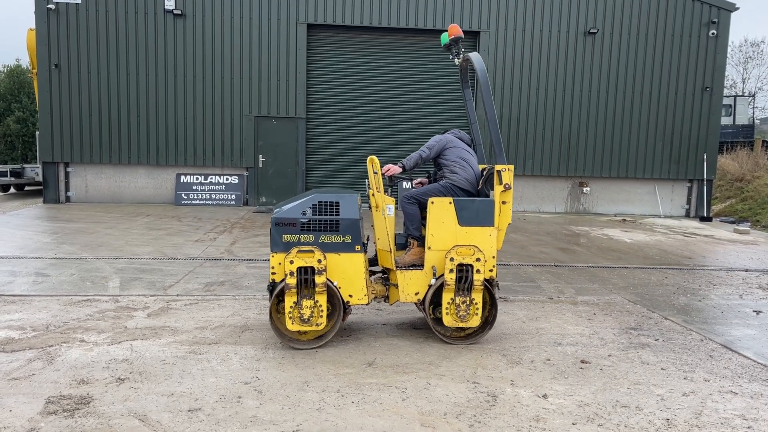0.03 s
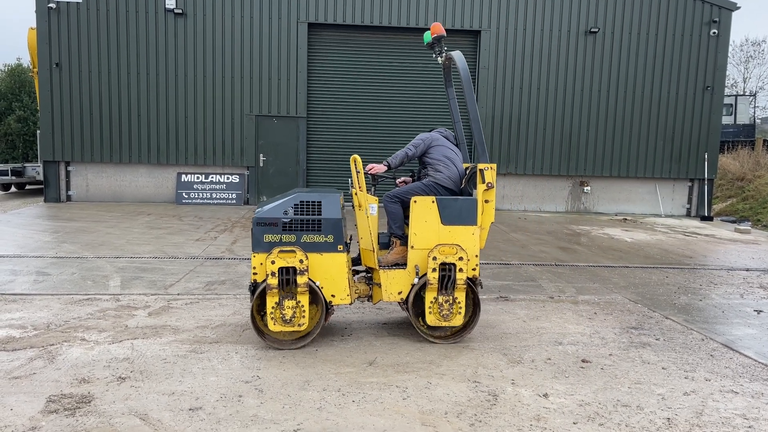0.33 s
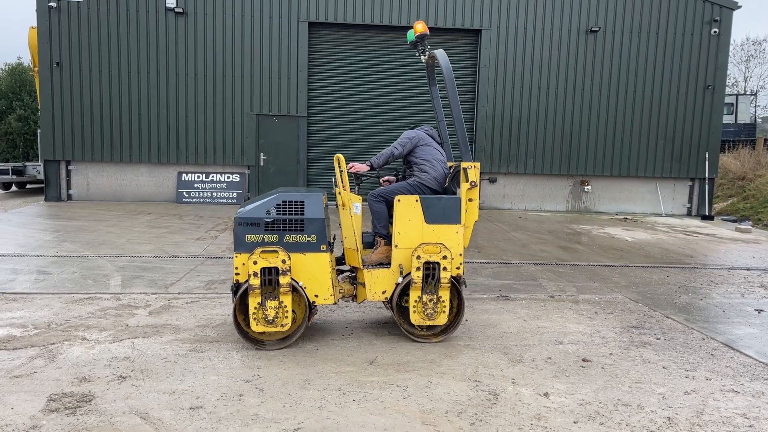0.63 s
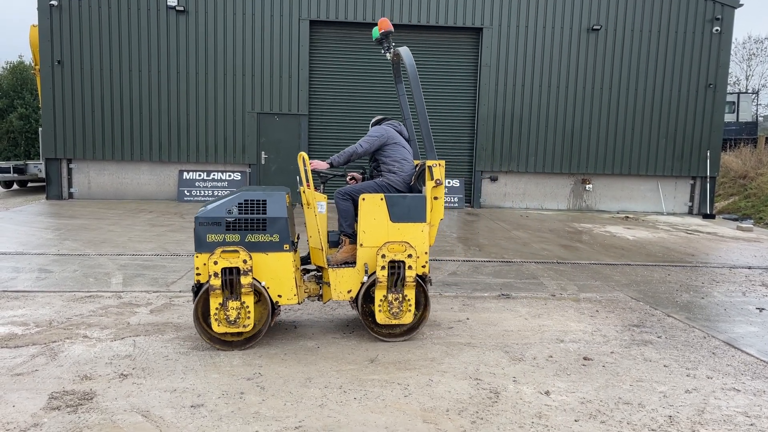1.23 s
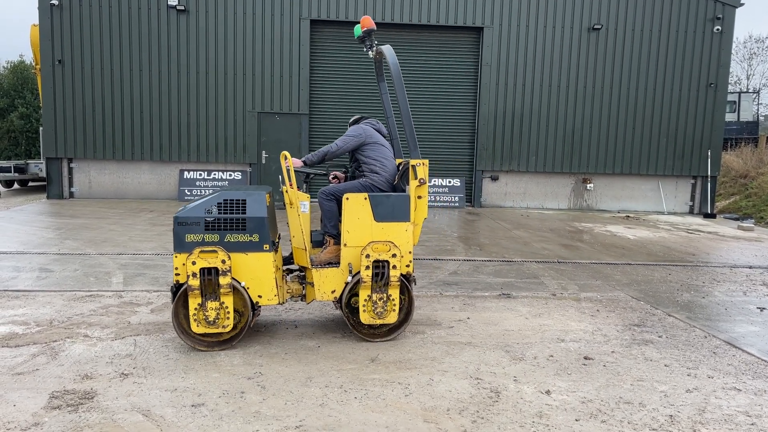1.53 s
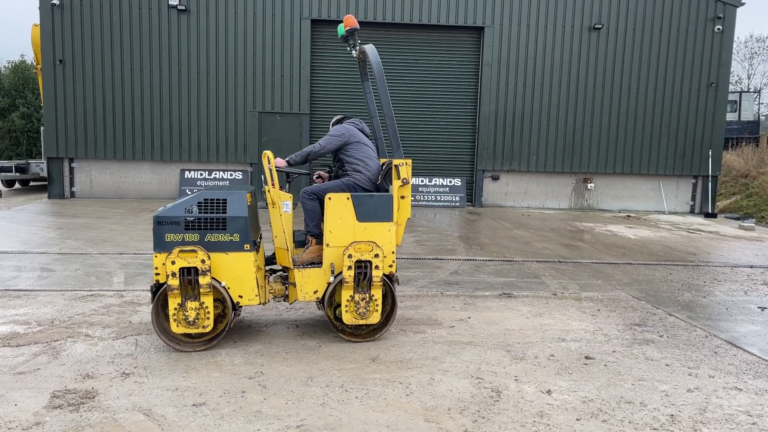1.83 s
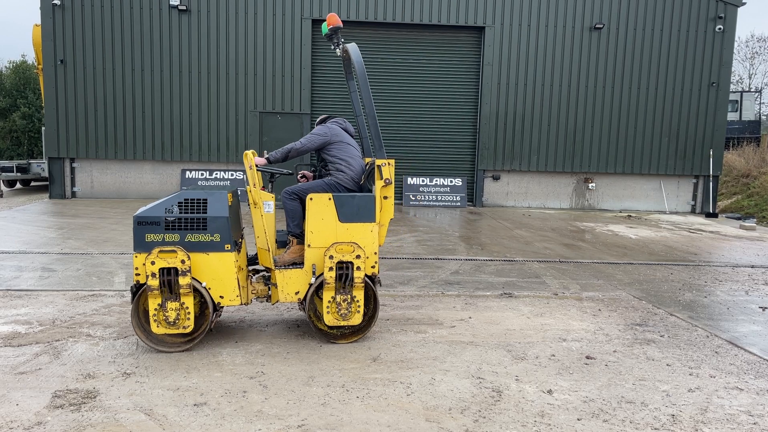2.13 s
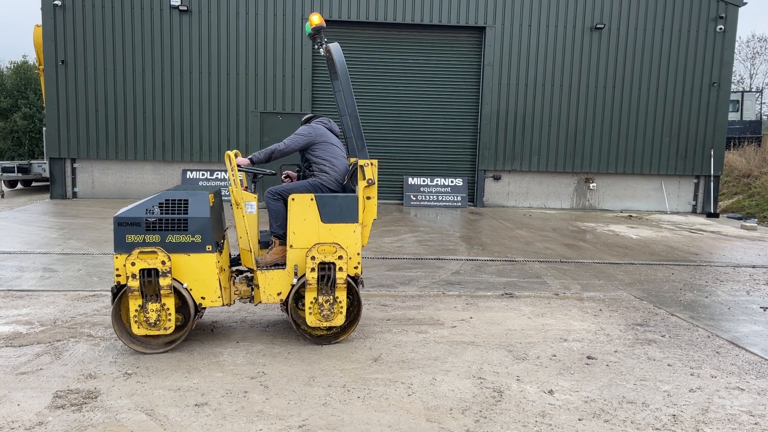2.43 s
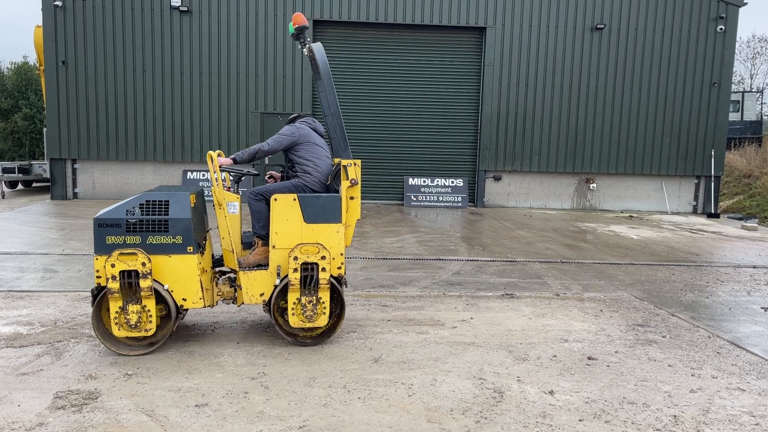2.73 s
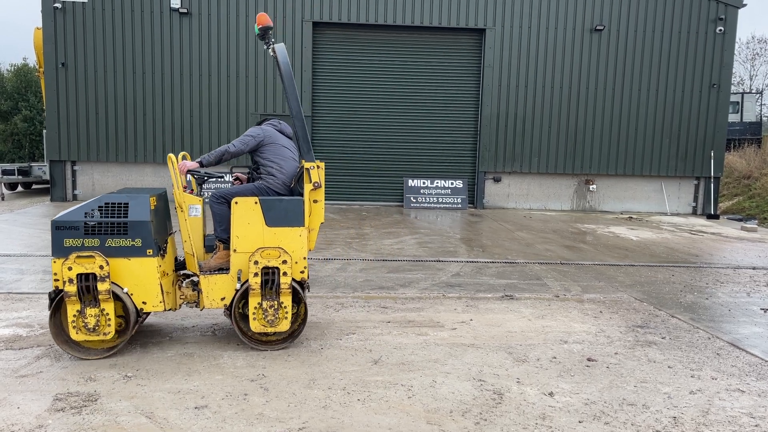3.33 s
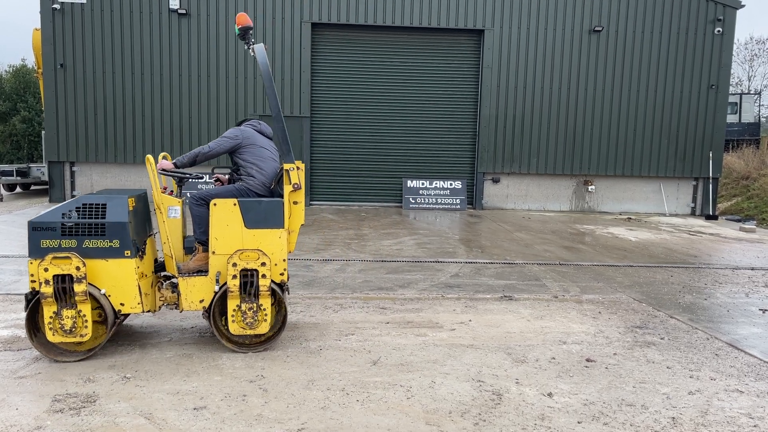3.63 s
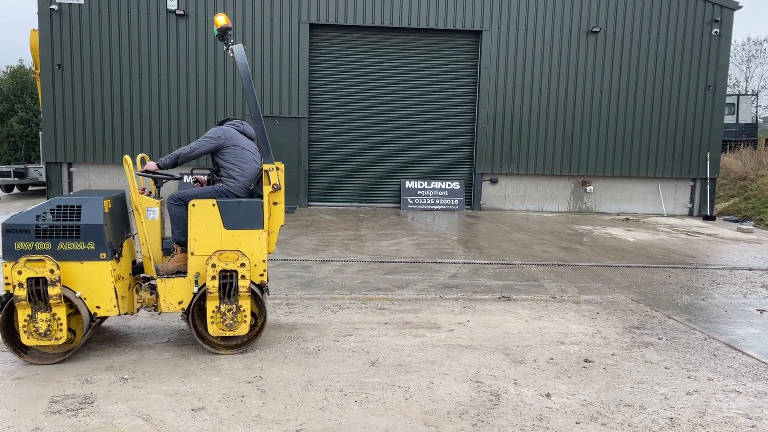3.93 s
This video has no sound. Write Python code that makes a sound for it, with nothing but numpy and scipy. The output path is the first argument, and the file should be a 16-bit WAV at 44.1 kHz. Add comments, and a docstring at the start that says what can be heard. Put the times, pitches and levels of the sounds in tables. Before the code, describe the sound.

Heard from a few metres away outdoors, a small road roller's diesel engine runs at a nearly constant speed over a low, wavering drum hum. Faint metal rattles and ticks of crushed stones continue, growing busier in the second half.

```python
"""A small diesel road roller creeps across a concrete yard, a few metres from a phone.
Its engine drones and clatters at a nearly steady speed. The drum shaker slows at the start,
then forces the steel drums to boom at its harmonics, which beat against the engine's.
Grit crackles under the drums, stones are crushed, one squeaks, and loose panels rattle.
A shed wall reflects all but the drone, boom and rumble."""
import sys
import numpy as np
from scipy import signal
from scipy.fft import rfft, irfft
from scipy.io import wavfile
from scipy.ndimage import uniform_filter1d

SR = 44100
rng = np.random.default_rng(int(sys.argv[2]) if len(sys.argv) > 2 else 0)


def inscribe(sig):
    """Save sig as 16-bit PCM at rate SR to the path in sys.argv[1].

    A 1-D sig is mono; a 2-D sig holds one channel per row.
    Samples are clipped to [-1, 1] before scaling.
    """
    pcm = np.round(np.clip(np.atleast_2d(sig).T, -1, 1) * 32767)
    wavfile.write(sys.argv[1], SR, pcm.astype(np.int16))


N = 176400
T, FREQ = np.arange(N) / SR, np.arange(N // 2 + 1) * SR / N

# Drum shaker: time_s, rotation_hz, second_harmonic_db, third_harmonic_db
SHAKER_MOTION = [(0, 74, -14, -30), (.12, 72.5, -14.5, -28), (.2, 65, -25, -28), (.25, 56, -22, -28),
                 (.29, 49.5, -17, -18), (.35, 47, -19, -15), (.43, 44.3, -24, -14.5), (.54, 42.3, -21, -20),
                 (.64, 41.8, -19, -13.5), (.78, 42.8, -21, -15), (.9, 41.7, -29, -14),
                 (1.02, 41.9, -32, -11.5), (1.15, 41.7, -27, -14), (1.35, 42, -26, -13),
                 (1.48, 42.5, -22, -19), (1.56, 41.4, -22, -16), (1.66, 41.5, -18, -19),
                 (1.84, 41, -17, -18), (1.99, 41.5, -18, -10.5), (2.14, 39.7, -17.5, -21),
                 (2.24, 42, -18, -13.5), (2.33, 42.3, -18, -16), (2.48, 41, -19, -13.5),
                 (2.57, 40.5, -15.5, -23), (2.7, 40.9, -19, -13.5), (2.8, 41.3, -17.5, -24),
                 (2.88, 40.2, -24, -13.5), (3.03, 40.5, -31, -22), (3.14, 40.2, -21, -14),
                 (3.25, 40.2, -20, -13), (3.32, 41.5, -19, -11.5), (3.42, 41, -18, -11.5),
                 (3.52, 42.8, -20, -15), (3.66, 42, -29, -20), (3.75, 41.5, -27, -16.5),
                 (3.85, 40.5, -25, -20), (4, 39.5, -26, -18)]


def exhaust(turns):
    """Periodic pulses radiate harmonics of the crankshaft; load at the start lifts the lowest six."""
    # Exhaust spectrum: order, light_db, loaded_db
    partials = [(1, -23.5, -22), (2, -16.5, -15), (3, -27.5, -22), (4, -35, -25.5), (5, -38, -23.5),
                (6, -36, -35), (7, -38.5, -41.5), (8, -45.5, -59), (10, -40.5, -62), (11, -39, -51)]
    load_end_s, load_fade_s = 0.33, 0.11
    load = np.clip(.5 + (load_end_s - T) / load_fade_s, 0, 1)
    drone = 0
    for order, light_db, loaded_db in partials:
        waver_db = .7 * np.sqrt(order) * walk(9)
        drone += harmonic(turns, order) * undb(light_db + (loaded_db - light_db) * load + waver_db)
    return drone


def clatter(turns):
    """Impact excitation: uneven knocks, one a turn, rattle block and panels over steady fan noise."""
    # Spectrum of block and panels: frequency_hz, relative_db
    body_spectrum = [(120, -15), (300, 0), (420, 0), (560, -1.5), (690, -2), (900, -2), (1120, -6.5),
                     (1300, -10), (1520, -11), (2100, -12.5), (2700, -18), (3050, -17.5), (3600, -18.5),
                     (7000, -22.5), (8500, -16.5), (13000, -17.5)]
    # Clatter envelope: time_s, level_db
    body_levels = [(0, -20.5), (.35, -25), (1, -26), (1.8, -24.5), (2.7, -23), (3.5, -23.5), (4, -25)]
    # Rasp envelope: time_s, level_db
    rasp_levels = [(0, -29), (.3, -34.5), (.5, -29), (.68, -36), (1, -35), (2.2, -37), (3, -62), (4, -58)]
    knock_share, decay_turns, scatter_db = 0.49, 0.69, 1.8
    rasp_hz, half_width_octaves = 1720, 0.34
    strength = undb(scatter_db * rng.standard_normal(1000))[turns.astype(int)]
    knock = strength * np.exp(-(turns % 1) / decay_turns)
    drive = np.sqrt(1 - knock_share + knock_share * knock ** 2 / np.mean(knock ** 2))
    body = colour(drive * noise_pair(), response(body_spectrum, FREQ))
    body *= undb(curve(body_levels) + .9 * walk(20))
    band_db = -10 * np.log10(1 + (np.log2((FREQ + 1) / rasp_hz) / half_width_octaves) ** 4)
    rasp = colour(drive * noise_pair(), band_db)
    rasp *= undb(curve(rasp_levels) + 2.0 * walk(13.34))
    return spread(body + rasp)


def drums(turns):
    """Forced vibration: the shaken drums boom, unevenly on rough ground; rolling adds a rumble."""
    # Drum radiation at the shaker's other harmonics: frequency_hz, level_db
    radiation = [(38, -44), (46, -35), (56, -23), (72, -17), (163, -26.5), (172, -29), (190, -26),
                 (207, -39), (250, -38), (300, -42), (450, -66)]
    # Rolling noise: frequency_hz, relative_db
    rumble_spectrum = [(20, -15), (45, -4), (70, -9), (100, -5), (135, 6), (170, 0.5), (195, 2.5),
                       (225, -6.5), (330, -12.5), (600, -16.5), (1200, -38)]
    rough_db, waver_db, rumble_db = 1.1, 3.5, -27
    boom = 0
    for order in (2, 3):
        boom += harmonic(turns, order) * undb(curve(SHAKER_MOTION, column=order) + rough_db * walk(45))
    for order in (1, 4, 5, 6, 7, 9):
        level_db = response(radiation, order * curve(SHAKER_MOTION))
        boom += harmonic(turns, order) * undb(level_db + waver_db * walk(8.28))
    rumble = spread(colour(noise_pair(), response(rumble_spectrum, FREQ)))
    return boom + rumble * undb(rumble_db)


def grit(turns):
    """Shot noise: dense tiny cracks, pressed out twice a shaker turn, ring the drum shell."""
    # Spectrum of cracking grit: frequency_hz, relative_db
    spectrum = [(500, -33), (1500, -3.5), (2500, 1.5), (3050, -5), (3800, -3), (4550, 1.5), (6200, 1),
                (7200, -2), (8500, 1), (13000, -4.5)]
    # Crackle envelope: time_s, level_db
    levels = [(0, -31.5), (.3, -40), (1.25, -44.5), (1.95, -38.5), (2.1, -27), (2.2, -36.5), (2.35, -29.5),
              (2.5, -36), (2.69, -26.5), (2.78, -36), (2.9, -33), (3.05, -32.5), (3.45, -29.5),
              (3.6, -39.5), (3.75, -43), (3.88, -36.5), (4, -30)]
    # Modes of the drum shell: pitch_hz, bandwidth_hz, relative_db
    shell_modes = [(2910, 65, 3), (3080, 93, 3.5), (4580, 44, 0), (5320, 100, -3), (6500, 54, -10.5)]
    grains_per_s, scatter_db, flicker_db, shell_db = 6000, 2.5, 2.0, -12
    cracks = (rng.random((2, N)) < grains_per_s / SR) * noise_pair()
    cracks *= undb(scatter_db * noise_pair())
    pressure = 1 + .65 * (np.cos(2 * np.pi * turns) + np.cos(4 * np.pi * turns)) / 2
    envelope = undb(curve(levels) + flicker_db * walk(45.3)) * pressure
    crackle = cracks / cracks.std() * envelope
    shell = undb(shell_db) * resonate(crackle, shell_modes)
    return spread(colour(crackle, response(spectrum, FREQ)) + shell)


def crushed_stones():
    """Brittle fracture: each stone snaps and crumbles in an exponentially decaying burst of noise."""
    # Stones breaking under the drums: start_s, level_db, decay_s
    fractures = [(.044, -21.5, 0.018), (.184, -20.5, .004), (.243, -23, .004), (.428, -29, 0.027),
                 (.505, -27, 0.014), (0.546, -23, .003), (.78, -19.5, 0.0073), (.867, -27.5, 0.027),
                 (0.993, -24.5, 0.0084), (1.099, -27, .005), (1.123, -22, 0.011), (1.343, -22.5, 0.021),
                 (1.459, -24.5, .011), (1.617, -23, .006), (1.63, -21.5, 0.023), (1.783, -22, 0.0047),
                 (1.802, -26, 0.049), (1.936, -25.5, 0.013), (2.04, -31, .012), (2.066, -21.5, .006),
                 (2.249, -21.5, 0.012), (2.317, -20, .004), (2.353, -20.5, 0.011), (2.384, -18.5, .01),
                 (2.462, -21.5, 0.0055), (2.753, -24, .004), (2.817, -18, 0.0045), (2.824, -20, 0.013),
                 (2.838, -23.5, .01), (2.851, -22, 0.024), (2.879, -20.5, .008), (2.895, -21, 0.0063),
                 (2.927, -22, 0.0044), (2.981, -20, .004), (3.079, -21, .004), (3.096, -17.5, 0.012),
                 (3.149, -14.5, 0.0048), (3.231, -20.5, 0.013), (3.352, -18.5, 0.0055), (3.375, -23, .004),
                 (3.416, -18.5, 0.013), (3.45, -19.5, 0.009), (3.492, -15, 0.0054), (3.518, -21, .007),
                 (3.633, -18, 0.0053), (3.644, -17, .005), (3.66, -17.5, 0.0065), (3.93, -21, .005),
                 (3.944, -20.5, .014)]
    # Spectrum of a fracture: frequency_hz, relative_db
    spectrum = [(500, -31), (1500, -3), (2500, -0.5), (3300, -3), (4000, 0.5), (4700, 3.5), (6300, 1.5),
                (7300, -0.5), (8700, 1), (13000, -6)]
    rise_s, rough_db = .0018, 2.0
    power = 0
    for start_s, level_db, decay_s in fractures:
        age = np.maximum(T - start_s + rise_s / 2, 0)
        power += (undb(level_db) * np.minimum(age / rise_s, 1) * np.exp(-age / decay_s)) ** 2
    bursts = noise_pair() * np.sqrt(power) * undb(rough_db * walk(700))
    return spread(colour(bursts, response(spectrum, FREQ)))


def panels(turns):
    """Modal resonance: loose steel panels rattle at their own pitches, harder once a shaker turn."""
    # Panel modes: pitch_hz, bandwidth_hz, relative_db
    modes = [(523, 14, -1), (597, 35, -5), (788, 23.5, 4), (827, 42, -2.5), (953, 38, 0.5), (1020, 26, -2),
             (1101, 63, -6.5), (1455, 26, -4.5), (1562, 21, -14.5)]
    # Rattle envelope: time_s, level_db
    levels = [(0, -34), (.05, -24), (.12, -31), (.3, -30), (.8, -31), (1.15, -30), (1.25, -32.5),
              (1.35, -24), (1.45, -32.5), (1.6, -27.5), (1.8, -28.5), (1.95, -30), (2.07, -25),
              (2.28, -31.5), (2.38, -26), (2.47, -30.5), (2.61, -27), (2.67, -22), (2.76, -31),
              (3.25, -26.5), (3.8, -31), (3.93, -27.5), (4, -31)]
    drive = (1 + 0.24 * np.cos(2 * np.pi * turns)) * noise_pair()
    return spread(resonate(drive, modes) * undb(curve(levels)))


def squeak():
    """Friction excitation: a slipping stone makes the drum sing briefly in wavering partials."""
    # Tones of stone on steel: pitch_hz, relative_db
    partials = [(3060, -8), (3275, -7), (3895, -8), (5532, -3), (5772, 0), (7282, -3)]
    peak_s, sigma_s, level_db = 1.144, .015, -37.5
    swell = np.exp(-((T - peak_s) / sigma_s) ** 2 / 2)
    wavering_time = np.cumsum(1 + .0015 * walk(200)) / SR
    return swell * sum(undb(level_db + db) * harmonic(wavering_time, hz) for hz, db in partials)


def steel_ring(impacts):
    """Free decay: every impact leaves a brief, dense ring in the steel."""
    decay_s, ring_gain = .012, undb(-12)
    age = T[:4096]
    tail = rng.standard_normal(len(age)) * np.exp(-age / decay_s)
    ringing = signal.fftconvolve(impacts, tail[None] / np.linalg.norm(tail), axes=1)[:, :N]
    return (impacts + ring_gain * ringing) / np.hypot(1, ring_gain)


def wall_echo(sound):
    """Reflection: the shed wall returns a weaker, later copy, whose end wraps round to the start."""
    delay_s, level_db = .062, -17
    return np.roll(sound, int(delay_s * SR), axis=1) * undb(level_db)


def spread(pair):
    """Partial coherence: one signal reaches both ports, the other is their diffuse difference."""
    # Field at the two microphone ports: frequency_hz, diffuse_db, left_minus_right_db
    field = [(30, -40, 4), (130, -20, 4), (387, -12, 1), (800, -19.5, 1.5), (1400, -10, -1),
             (2340, 0.5, 2.5), (2940, -8, 4), (3700, -13, 3.5), (4860, -5.5, 6), (6300, -10.5, 2.5),
             (7300, -16, 4), (8600, -7.5, 0), (12000, -26, 0.5)]
    diffuse = undb(response(field, FREQ))
    side = np.array([[1], [-1]])
    pan = undb(side * response(field, FREQ, column=2) / 2)
    spectra = rfft(pair[0]) + side * diffuse * rfft(pair[1])
    return irfft(spectra / np.sqrt(1 + diffuse ** 2) * pan, N)


def resonate(drive, modes):
    """Modal superposition: damped resonances of alternating sign, keeping the power of white input."""
    gain = 0
    for k, (hz, width_hz, db) in enumerate(modes):
        gain += undb(db) * (-1) ** k * FREQ * width_hz / (hz ** 2 - FREQ ** 2 + 1j * FREQ * width_hz)
    return irfft(rfft(drive) * gain / np.sqrt(np.mean(np.abs(gain) ** 2)), N)


def colour(sound, db):
    """Spectral shaping by a gain per frequency, keeping the power of white input."""
    gain = undb(db)
    return irfft(rfft(sound) * gain / np.sqrt(np.mean(gain ** 2)), N)


def harmonic(turns, order):
    """A cosine of rms 1; phase-locked orders crest together, making one thump a turn."""
    return np.sqrt(2) * np.cos(2 * np.pi * order * turns)


def noise_pair():
    """Two independent white Gaussian noises."""
    return rng.standard_normal((2, N))


def walk(rate_hz):
    """Random modulation: values held for 1 / rate_hz seconds and smoothed twice; spread near 1."""
    hold = int(SR / rate_hz)
    steps = np.repeat(rng.standard_normal(N // hold + 1), hold)
    return 1.3 * uniform_filter1d(uniform_filter1d(steps, hold), hold)[:N]


def curve(rows, column=1):
    """Linear interpolation of a table column in time."""
    rows = np.array(rows)
    return np.interp(T, rows[:, 0], rows[:, column])


def response(rows, hz, column=1):
    """Interpolation of a table column on a log-frequency axis."""
    rows = np.array(rows)
    return np.interp(np.log(hz + 1), np.log(rows[:, 0] + 1), rows[:, column])


def undb(db):
    """Decibels to amplitude ratio."""
    return 10 ** (np.asarray(db) / 20)


def scene():
    """Superposition: engine and shaker turn at different rates, so their harmonics beat."""
    # Crankshaft speed: time_s, rotation_hz
    engine_speed = [(0, 51.2), (.31, 50.6), (.39, 55.6), (.58, 54.8), (.82, 51.5), (1.0, 52.4), (1.25, 53),
                    (1.95, 51.9), (2.5, 52.2), (3.4, 51.5), (3.68, 53.2), (3.82, 51.7), (4, 52.6)]
    # Shaft angles in turns: starting angle, integrated speed and jitter.
    crank = 1.125 + np.cumsum(curve(engine_speed)) / SR + .004 * walk(20)
    shaker = 0.2916 + np.cumsum(curve(SHAKER_MOTION)) / SR + .006 * walk(16)
    impacts = clatter(crank) + grit(shaker) + crushed_stones()
    bright = steel_ring(impacts) + panels(shaker) + squeak()
    lean_left = undb([[0.24], [-0.24]])
    return (exhaust(crank) + drums(shaker)) * lean_left + bright + wall_echo(bright)


def record(dry):
    """Transduction: the ports colour and phase-shift the treble; the phone rounds peaks and cuts highs."""
    # Response of the microphone ports: frequency_hz, gain_db, left_lead_rad
    ports = [(20, 0, 0), (300, 0, .04), (900, 0, .25), (1500, 0, .8), (2200, 0, 1.5), (2900, 0, .5),
             (4700, 0, .8), (6300, 0, .1), (7700, 0, .9), (8700, 0, -.1), (9400, 2, -1.8), (9950, 4, -2.7),
             (10500, 1, -3.6), (11200, -7, -4.9), (11700, -10, -6.28), (12500, -15, -6.28)]
    cutoff_hz = 12500
    phase = np.array([[0], [-1]]) * response(ports, FREQ, column=2)
    heard = irfft(rfft(dry) * undb(response(ports, FREQ)) * np.exp(1j * phase), N)
    rounded = heard / (1 + np.abs(heard) ** 8) ** (1 / 8)
    lowpass = signal.ellip(8, .2, 70, cutoff_hz, fs=SR, output="sos")
    return signal.sosfilt(lowpass, rounded)


dry = scene()
out = record(dry)
inscribe(out)
```